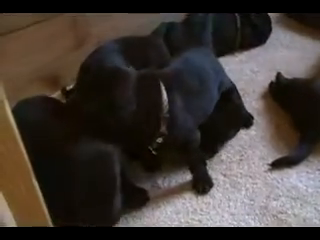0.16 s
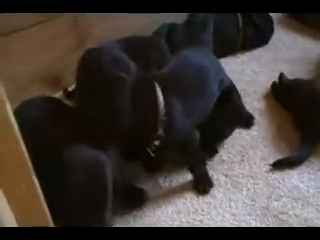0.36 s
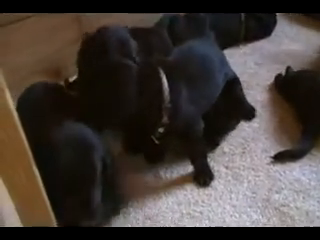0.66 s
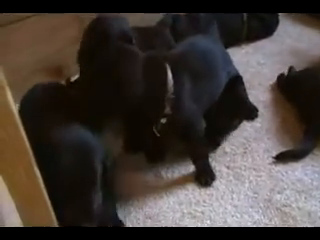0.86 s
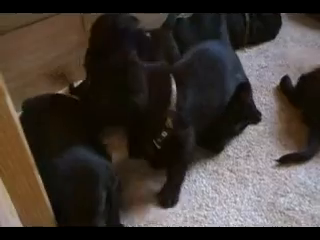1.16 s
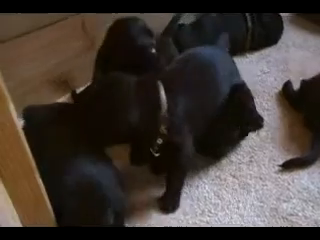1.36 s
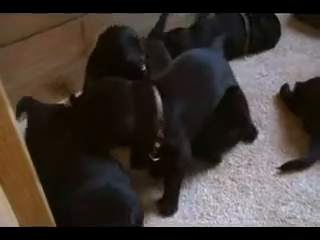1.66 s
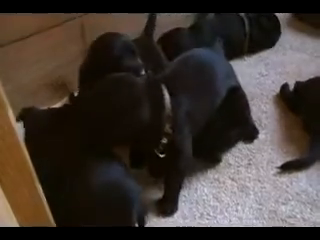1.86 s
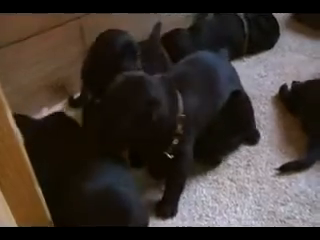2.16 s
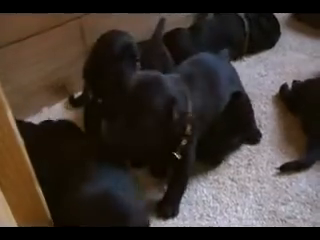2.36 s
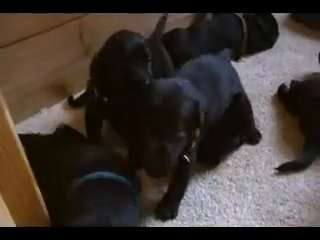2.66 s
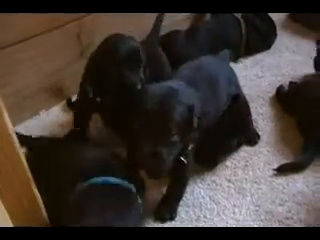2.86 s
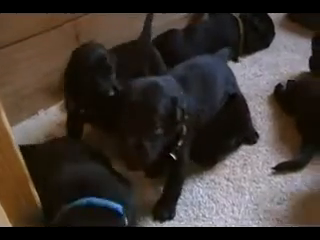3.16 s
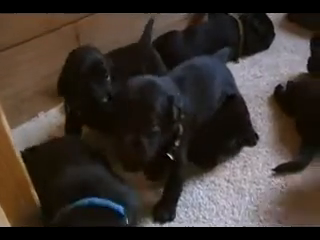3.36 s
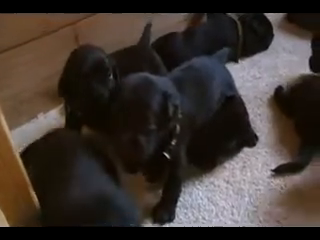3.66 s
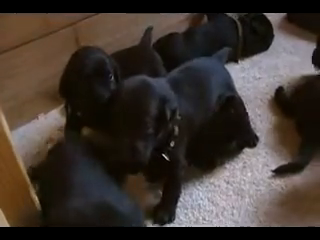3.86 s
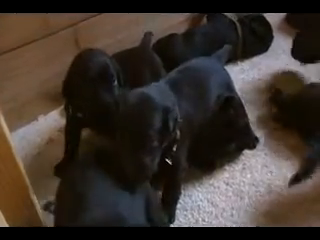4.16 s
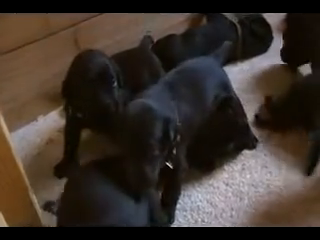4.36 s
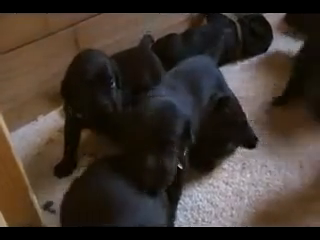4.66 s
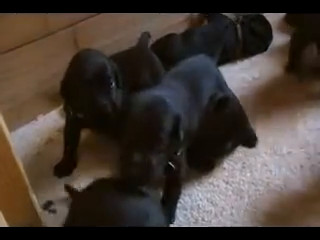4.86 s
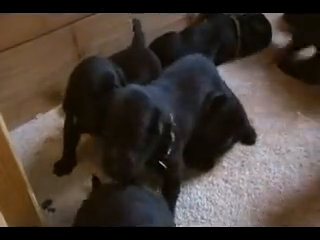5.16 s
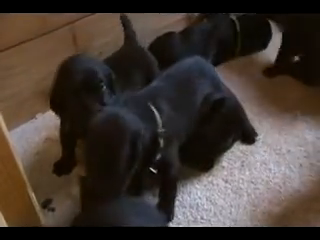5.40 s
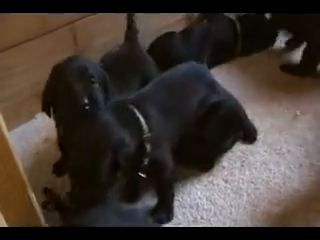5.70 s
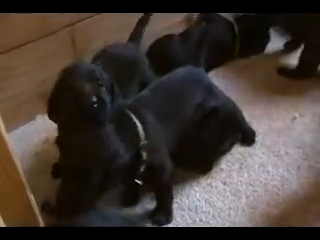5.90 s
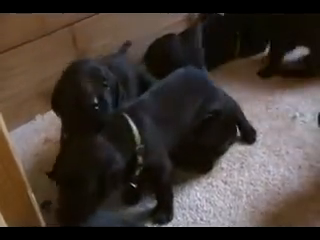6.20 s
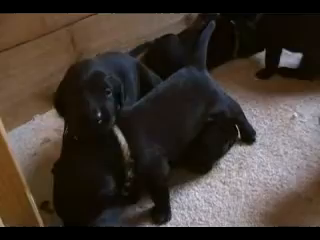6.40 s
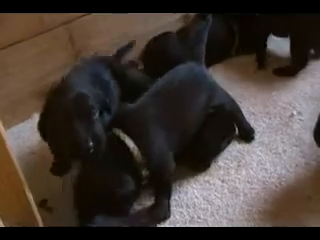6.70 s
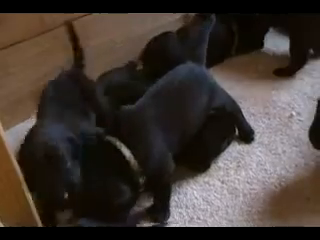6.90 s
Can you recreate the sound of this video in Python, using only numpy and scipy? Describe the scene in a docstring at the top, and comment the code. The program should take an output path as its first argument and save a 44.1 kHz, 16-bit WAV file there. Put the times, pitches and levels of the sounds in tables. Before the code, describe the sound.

Young puppies yelp, give two piercing screams, then whimper in quick whistles, yelps, hoots and tired groans, with paws bumping in a small carpeted box.

```python
"""Puppies whimpering in a box

A litter in a carpeted wooden box, close to two microphones in a small room: a yelp, two screams, then
whistles, yelps, hoots, moans and groans. Each voice is a pulse train ringing a throat filter, plus air noise.
Paws are decaying sines, claws and scuffs short noise bands; rumble, hiss and rustle are shaped stereo noise."""
import sys
import numpy as np
from scipy import signal
from scipy.fft import rfft, irfft
from scipy.io import wavfile
from scipy.ndimage import map_coordinates

SR = 44100
rng = np.random.default_rng(int(sys.argv[2]) if len(sys.argv) > 2 else 0)


def waveform_to_disk(signal):
    """Save audio, clipped to [-1, 1], as 16-bit WAV at the path in sys.argv[1]."""
    frames = np.transpose(np.atleast_2d(signal))
    scaled = np.clip(frames, -1, 1) * 32767
    samples = np.round(scaled).astype(np.int16)
    wavfile.write(sys.argv[1], SR, samples)


N = 310464

# Room rumble: (time [s], level [dB])
RUMBLE_LEVEL = [(3.6, -40), (6.5, -47)]
# Room hiss spectrum, used above 40 Hz: (frequency [Hz], relative density [dB])
HISS_SPECTRUM = [(12, -29), (20, 1), (46, -3), (352, -15.5), (505, -19.5), (725, -18), (1070, -25.5),
                 (1450, -23), (3000, -29.5), (9130, -31.5), (13900, -45.5), (15500, -67)]
HISS_DB = -46
# Rustle of bodies, before rustle_db and flicker: (time [s], level [dB])
RUSTLE_LEVEL = [(0, -57), (.6, -50.5), (3, -50.5), (7.04, -50)]
# Rustle spectrum: (frequency [Hz], relative level [dB])
RUSTLE_SPECTRUM = [(150, 13.5), (400, -17), (3000, -0.5), (8000, -9), (14000, -15.5)]
# Left-right likeness of the noise: (frequency [Hz], shared power [0-1])
STEREO_LIKENESS = [(200, 0.67), (4000, 0.25), (12000, 0.8)]

# Paws on the box floor: (time [s], level before the rise [dB], ring [Hz], t60 [s])
PAW_BUMPS = [(0.021, -21.5, 96.4, 0.16), (1.463, -29, 102.5, 0.2), (2.189, -25, 102.6, 0.22),
             (3.381, -29.5, 145, 0.17), (3.453, -9.5, 140, 0.021), (4.363, -11, 102.5, 0.063),
             (4.527, -28.5, 101, 0.12), (5.197, -22.5, 141, 0.071), (5.453, -21, 102.5, 0.19),
             (6.401, -29.5, 103, 0.16), (6.988, -4, 112, 0.012)]
# Claws and collars: (time [s], level before tick_db [dB], ring [Hz])
CLAW_TICKS = [(0.324, -31.5, 9800), (0.7291, -27, 1915), (2.824, -35, 9850), (3.336, -24, 1900),
              (4.438, -35, 3450), (5.1557, -26, 7400), (6.1846, -31, 1760), (6.4445, -28, 6000),
              (6.561, -32.5, 2400), (6.765, -27, 7560), (6.8536, -30, 1940)]
# Paws and fur on carpet: (time [s], length [s], level before the stroke envelope [dB], centre [Hz])
CARPET_SCUFFS = [(0.181, 0.055, -39.5, 600), (1.199, 0.036, -42, 515), (2.386, 0.1, -44.5, 477),
                 (3.578, 0.017, -39.5, 630), (5.139, 0.048, -38.5, 454), (5.15, 0.17, -53, 7250),
                 (5.416, 0.036, -48, 2330)]

# Throat, mouth nearly shut: (frequency [Hz], relative gain [dB])
SHUT_THROAT = [(40, -15.5), (250, 0.5), (500, 1), (740, 8), (1050, -14), (1350, -9.5), (1750, -13.5),
               (2020, -23.5), (3000, -43.5), (4000, -47), (5100, -32), (6400, -49.5), (8500, -41.5),
               (12000, -80)]
# Throat, mouth wide open: (frequency [Hz], relative gain [dB])
OPEN_THROAT = [(60, -8), (300, 0.5), (450, -11), (650, -0.5), (950, 5.5), (1500, 7), (1950, 8), (2400, 3),
               (3050, -22.5), (3750, -2.5), (4600, 1), (5400, -1.5), (6100, -10), (6900, -18), (12000, -51)]
# Throat tightened for the breaking scream: (frequency [Hz], gain added to the open throat [dB])
TIGHT_THROAT = [(300, 4), (600, 2.5), (1500, 3), (2400, -1.5), (3750, 7), (4600, 8.5), (5400, -8.5),
                (6100, -4.5), (9000, 5)]
# Mouth opened a little for a yelp: (frequency [Hz], gain added to the shut throat [dB])
AJAR_MOUTH = [(400, 0), (720, -1), (1050, 3.5), (1700, 0), (2200, -3.5), (3000, 0), (5200, 3), (8000, 1)]
# Nose passage of the grunts: (frequency [Hz], relative gain [dB])
NOSE_PASSAGE = [(80, -39), (270, 7.5), (450, -7), (700, 5.5), (1150, -12), (2100, -10), (3300, -46),
                (9000, -46)]
# Breath spectrum: (frequency [Hz], relative level [dB])
BREATH_SPECTRUM = [(300, -14), (1500, -6), (3000, -8), (5200, -9), (6500, -24), (8800, 1.5), (14000, -30)]
# Lip opening of the muffled voice: (time [s], gain above 3.5 kHz [dB])
LIP_OPENING = [(1.3, -1), (2.5, 5), (4.6, 2), (6, 6)]
# Nasal resonance as the voice tires: (time [s], gain at NASAL_HZ [dB])
NASAL_GAIN = [(4, -15), (4.6, 2.5), (6.3, 11)]
NASAL_HZ, NASAL_WIDTH_HZ = 1328, 71

# In the cry tables, split is the weakening of every other pulse.
# Yelps: (start [s], length [s], rasp level [dB], clear end level [dB], first pitch [Hz], lowest pitch [Hz],
# last pitch [Hz], added roughness of the rasp [0-1], brightness before the final dulling [dB])
YELP_EVENTS = [(0.249, 0.036, -24.5, -19, 940, 597, 718, 0.65, 6),
               (1.296, .055, -22.5, -16, 838, 682, 792, 0.82, 18),
               (1.572, 0.14, -21.5, -17.5, 798.8, 587, 810, 1, 18),
               (1.938, 0.093, -21, -20, 830, 546, 710, 0.84, 17),
               (2.225, .081, -20, -12.5, 759, 656, 812, 0.77, 16.5),
               (2.575, .057, -23, -18, 780, 576, 773, 0.85, 11),
               (2.896, 0.021, -20, -20, 710, 686, 884, 0.65, 6.5),
               (4.04, .077, -20, -18.5, 734, 579, 750, 0.28, 13.5),
               (5.276, .051, -17.5, -21, 846, 453.4, 718, 0.65, 5.5)]
RECOVER_S, CLEAR_S = .031, 0.015  # pitch minimum before the end; time for the rasp to clear
RASP_SPLIT, CLEAR_ROUGH, CLEAR_DULL_DB = 0.39, 0.04, -11
THROB_DB, THROB_HZ = 4, 55.7  # depth at full roughness; beating rate
PUFF_DB, PUFF_S, PUFF_HZ, PUFF_SHARPNESS = -51, 0.039, 3500, 1.8
# Clear scream: (time [s], pitch [Hz], fundamental level [dB], overtones over it [dB])
SCREAM_CURVE = [(0.505, 970, -22, -6), (0.513, 1030, -20.5, -19), (0.525, 1130, -23, -12),
                (0.535, 1188, -27, 16), (0.559, 1223, -23, 12.5), (0.573, 1306, -17.5, 2.5),
                (0.593, 1213, -20.5, 3.5), (0.617, 1235, -21.5, -7.5), (0.641, 1094, -27.5, 10.5),
                (0.663, 1123, -27, 8), (0.676, 1081, -37, 4)]
CATCH_S, GASP_S, GASP_DB = 0.0039, .026, -37  # rough catch, closing gasp
# Breaking scream, before beating: (time [s], level [dB], pitch [Hz], split [0-1], roughness [0-1], brightness [dB])
SHRIEK_CURVE = [(0.86, -15.5, 1115, 0.62, 0.55, -11), (.868, -32, 1198, 0.2, 0.05, -12),
                (.894, -17, 1323, 0, 0.08, -9), (.91, -12.5, 1442, 0, 0.07, -7),
                (.915, -47, 1467, 0.2, 0.43, -22), (0.92, -16, 572, 0.06, 0.98, 2),
                (0.962, -18, 618, 1, 0.33, 2), (1.018, -21, 638, 0.84, 0.29, -9.5),
                (1.044, -39, 775, .4, 0.2, -17)]
SHRIEK_THROB_DB, SHRIEK_SWAY = 2.5, 0.0406  # level and fractional pitch beating at full roughness
# Thin whistles, mostly leading into a yelp: (start [s], length [s], level after the swell [dB],
# first pitch [Hz], top pitch [Hz], roughness [0-1], brightness [dB])
WHISTLE_EVENTS = [(1.269, 0.0324, -25.5, 1200, 1283, 0.03, 10), (1.539, 0.034, -28.5, 870, 1140, 0, -6),
                  (1.893, 0.049, -28, 932, 1244, 0, -11), (2.211, 0.019, -30.5, 1070, 1190, 0.06, 0),
                  (2.532, 0.038, -30, 850, 1140, 0.02, -10), (2.84, 0.05, -36.5, 860, 1147, 0, -15),
                  (3.984, 0.058, -23.5, 731, 1136, 0.18, 9), (4.297, 0.062, -46, 990, 1160, 0, -13)]
SWELL_DB, SWELL_S = -7, 0.007  # initial offset and time constant, whistles and hoots
# Grunts through the nose: (start [s], length [s], first level [dB], pitch [Hz], split [0-1],
# roughness [0-1], first brightness [dB])
GRUNT_EVENTS = [(3.006, 0.012, -20, 667, 0.05, 0.37, 13.5), (3.285, 0.023, -22, 687, 1, 0.34, 10.5),
                (6.376, 0.0166, -25.5, 532, 1, 0.28, 0.5), (6.65, 0.038, -26.5, 486.5, 0.98, 0.34, 3)]
GRUNT_FADE_DB, GRUNT_DULL_DB = -21, -11
# Soft hoots: (start [s], length [s], level before swell and ring [dB], first, middle, last pitch [Hz],
# split [0-1], roughness [0-1], brightness [dB])
HOOT_EVENTS = [(3.206, .017, -13, 787, 735, 793, 0.21, 0.36, 11),
               (3.432, 0.009, -19, 875, 840, 790, .03, 0.37, -8),
               (3.459, 0.037, -15.5, 913, 819, 672, .07, 0.59, 5),
               (3.705, .058, -15.5, 722, 881, 653, 0.014, 0.044, -3.5),
               (4.372, 0.014, -13, 770, 701, 700, .08, 0.49, 7),
               (5.24, .039, -15, 720, 890, 900, 0.15, 0.23, -2),
               (5.542, 0.022, -15, 714, 763, 820, 0.25, 0.24, -4),
               (5.57, 0.0095, -14, 826, 827, 866, 0.48, 0.3, -4),
               (5.588, 0.018, -14, 898, 737, 574, 0.11, 0.074, -1.5)]
HOOT_RING = 0.72  # share of the throat resonance followed by the level
# Two drawn-out moans, one curve each: (time [s], level [dB], pitch [Hz], split [0-1], roughness [0-1],
# brightness [dB])
MOAN_CURVES = [
    [(4.592, -22, 687, 0, 0.2, 1), (4.601, -18.5, 825, 0.44, 0.5, 9.5),
     (4.62, -15.5, 808, 0.63, 0.11, -1.5), (4.649, -15, 865, 0.74, 0.04, 0.5),
     (4.664, -20, 918, 1, 0.13, 30), (4.718, -19, 857, 0.93, 0, 0.5), (4.735, -32, 930, 1, 0.1, -7)],
    [(4.949, -13.5, 854, 0.16, 0.65, -2), (4.965, -17.5, 698, 1, 0.28, 3.5),
     (4.997, -16, 812, 0.78, 0.3, 3), (5.022, -25.5, 1282, 1, .24, -6)],
]
# Tired groans: (start [s], time to the drop [s], length [s], level at the drop [dB], upper pitch [Hz],
# lower pitch [Hz], brightness [dB])
GROAN_EVENTS = [(5.784, .043, 0.059, -16.5, 708.5, 515, -2), (6.06, 0.0154, 0.042, -20.5, 640, 483, -3.5),
                (6.299, 0.018, 0.064, -20, 677, 518.3, -3.5), (6.576, .019, 0.0478, -24.5, 599, 458, -3.5),
                (6.872, 0.0021, 0.032, -21, 506, 499, -2)]
GROAN_SWELL_DB, GROAN_FADE_DB, DROP_S = -7.5, -8.5, 0.0016

# Reverberation: (frequency [Hz], t60 [s], relative level [dB])
ROOM_DECAY = [(150, 0.18, -4), (724, 0.16, -4), (1540, 0.12, -2.5), (2500, 0.17, -5.5), (8000, 0.12, 3.5)]
# Channel balance: (frequency [Hz], left minus right [dB])
CHANNEL_BALANCE = [(100, 1.1), (500, -0.3), (1200, 0.2), (2400, 2.5), (4800, -3), (8000, 0)]
EDGE_HZ = 15400


def amp(db):
    """Decibels to gain."""
    return 10 ** (np.asarray(db) / 20)


def unit(x):
    """Scales to rms 1."""
    return x / np.sqrt(np.mean(x ** 2) + 1e-20)


def read(points, hz):
    """Reads a table on a log-frequency axis."""
    f, value = np.transpose(points)
    return np.interp(np.log(hz + 1), np.log(f + 1), value)


def add(mix, s, sound):
    """Lays a sound into the mix at a time."""
    part = mix[max(round(s * SR), 0):][:len(sound)]
    part += sound[:len(part)]


def colour(x, points, size=2048):
    """Minimum-phase filter with the given spectrum: it rings after each pulse, never before."""
    log_gain = np.log(amp(read(points, abs(np.fft.fftfreq(size, 1 / SR)))))
    taps = np.fft.ifft(np.exp(np.conj(signal.hilbert(log_gain)))).real
    return signal.fftconvolve(x, taps[:size // 2])[:len(x)]


def band_noise(size, hz, sharpness):
    """Noise in one resonance, rms 1."""
    f = np.fft.rfftfreq(size, 1 / SR) + 1
    resonance = 1 + 1j * sharpness * (f / hz - hz / f)
    return unit(irfft(rfft(rng.standard_normal(size)) / resonance, size))


def wide_noise(points):
    """Two partly alike channels of noise with the given spectrum, rms 1."""
    hz = np.fft.rfftfreq(N, 1 / SR)
    common, *apart = rfft(rng.standard_normal((3, N)))
    same = np.clip(read(STEREO_LIKENESS, hz), 0, 1)
    stereo = np.sqrt(same) * common + np.sqrt(1 - same) * np.array(apart)
    return unit(irfft(stereo * amp(read(points, hz)), N))


def background(rumble_hz=31, rustle_db=-5, flicker_db=2):
    """Room rumble and hiss, and the uneven rustle of bodies shifting against each other."""
    t = np.arange(N) / SR
    rumble = wide_noise([(rumble_hz / 2, -18), (rumble_hz, 0), (rumble_hz * 2, -36), (rumble_hz * 10, -90)])
    hiss = wide_noise([(30, -31)] + [(max(hz, 70), db) for hz, db in HISS_SPECTRUM if hz > 40])
    stir_db = np.interp(t, *np.transpose(RUSTLE_LEVEL)) + flicker_db * band_noise(N, 19.0, 1.0)
    rustle = amp(stir_db + rustle_db) * wide_noise(RUSTLE_SPECTRUM)
    rumble_db = np.interp(t, *np.transpose(RUMBLE_LEVEL))
    return amp(rumble_db) * rumble + amp(HISS_DB) * hiss + rustle


def paws(rise_s=0.002, scuff_sharpness=4.7, tick_sharpness=4.3, tick_db=-7, tick_t60_s=0.022):
    """Soft bumps ring the floor of the box, claws tick, pads drag on the carpet."""
    out, t = np.zeros(N), np.arange(SR // 3) / SR
    for s, db, hz, t60_s in PAW_BUMPS:
        decay = amp(db - 60 * t / t60_s)
        add(out, s, decay * (1 - np.exp(-t / rise_s)) * np.sin(2 * np.pi * hz * t))
    for s, db, hz in CLAW_TICKS:
        decay = amp(db + tick_db - 60 * t / tick_t60_s)
        add(out, s, decay * band_noise(len(t), hz, tick_sharpness))
    for s, length_s, db, hz in CARPET_SCUFFS:
        stroke = np.sqrt(np.hanning(int(length_s * SR)))
        add(out, s, amp(db) * stroke * band_noise(len(stroke), hz, scuff_sharpness))
    return out


def folds(hz, split, rough, turbulence, jitter=0.12, shimmer=0.7, waver=.002, lurch=0.0835,
          puff_s=0.00055, size=8):
    """One pulse a cycle; weak alternate pulses add the octave below, uneven ones make the voice harsh."""
    n, rough = np.arange(len(hz)), np.clip(rough, 0, 1)
    wobble = (waver + lurch * rough) * band_noise(len(hz), 57.2, 0.95)  # a strained voice lurches
    turns = np.cumsum(hz * (1 + wobble)) / SR
    at = np.interp(np.arange(.5, turns[-1]), turns, n)
    late, strong = rng.standard_normal((len(at), 2)).T
    hz, split, uneven = (np.interp(at, n, c) for c in (hz, np.clip(split, 0, 1), rough))
    at = at + jitter * uneven * late * SR / hz
    alternate = 1 - split * (np.arange(len(at)) % 2)
    height = alternate * np.exp(shimmer * uneven * strong) / np.sqrt(hz)
    # windowed sinc: pulses fall between samples
    near = at.astype(int)[:, None] + np.arange(-size, size + 1)
    offset = near - at[:, None]
    shapes = height[:, None] * np.sinc(offset) * np.sinc(offset / size)
    pulses = np.bincount(np.clip(near, 0, n[-1]).ravel(), shapes.ravel(), len(n))
    # each rough pulse lets out a short puff of turbulent air
    keep = np.exp(-2 / (puff_s * SR))
    puffs = np.sqrt(signal.lfilter([1 - keep], [1, -keep], pulses ** 2)) * rng.standard_normal(len(n))
    return turbulence * rough * puffs - pulses


def spread(x, path_s, back=.55):
    """All-pass: quick echoes between the box walls lengthen each pulse without colouring it."""
    loop = np.r_[1, np.zeros(round(path_s * SR)), -np.clip(back, 0, .8)]
    return signal.lfilter(loop[::-1], loop, x)


def cry(rows, throat, turbulence, upper_hz, air_db, air_growth, lead_s=.004, size=400):
    """Pulses ring the throat; brightness lifts the partials above upper_hz; air hisses through the mouth."""
    s, *columns = np.transpose(rows)
    s = np.sort(s)
    t = np.arange(s[0] - lead_s, s[-1] + lead_s, 1 / SR)
    level_db, hz, split, rough, bright_db = (np.interp(t, s, c) for c in columns)
    voice = colour(folds(hz, split, rough, turbulence), throat)
    voice = spread(spread(voice, .00052), .00083)
    voice = signal.sosfilt(signal.butter(2, 130, "highpass", fs=SR, output="sos"), voice)
    lower = signal.sosfiltfilt(signal.butter(N=4, Wn=upper_hz, fs=SR, output="sos"), voice)
    voice = lower + amp(bright_db) * (voice - lower)
    # level out, so that loudness follows the effort alone
    window = np.hanning(size) / np.hanning(size).sum()
    voice = voice / np.sqrt(abs(signal.fftconvolve(voice ** 2, window, "same")) + 1e-12)
    # air_db holds at a voice level of -13 dB
    air = unit(colour(rng.standard_normal(len(t)), BREATH_SPECTRUM)) * amp(air_db + air_growth * (level_db + 13))
    # each cry fades in and out over twice lead_s
    edges = np.clip(np.minimum(t - t[0], t[-1] - t) / (2 * lead_s), 0, 1) ** 2
    return t[0], (voice * amp(level_db) + air) * edges


def controls(*curves):
    """Rows of (time [s], level [dB], pitch [Hz], split, roughness, brightness [dB]) for one cry."""
    return np.column_stack(np.broadcast_arrays(*curves))


def muzzle(s, extra=((1, 0), (2, 0)), count=160):
    """The nearly shut throat at a given time, with any extra shaping: (frequency [Hz], gain [dB])."""
    hz = np.geomspace(40, 12000, count)
    lips_db, nasal_db = (np.interp(s, *np.transpose(curve)) for curve in (LIP_OPENING, NASAL_GAIN))
    nasal = nasal_db * np.exp(-((hz - NASAL_HZ) / NASAL_WIDTH_HZ) ** 2)
    gain_db = read(SHUT_THROAT, hz) + read(extra, hz) + nasal + lips_db * (hz > 3500)
    return np.column_stack([hz, gain_db])


def throb(t, count=64):
    """Smooth random beating of a rasping voice, from two random points per cycle of THROB_HZ."""
    return map_coordinates(rng.standard_normal(count), [2 * THROB_HZ * t], mode="wrap")


def yelp(start, length, rasp_db, clear_db, first_hz, low_hz, last_hz, rough, bright_db, dip_db=-2):
    """The voice breaks into a throbbing rasp and sinks, then clears and swoops to its last pitch."""
    t = np.arange(0, length, 1 / SR)
    turn = max(length - RECOVER_S, length / 4)
    sink = np.minimum(t / turn, 1)
    rise = np.sin(np.pi / 2 * np.maximum(t - turn, 0) / (length - turn)) ** 2
    rasp = np.clip((turn - t) / CLEAR_S + .5, 0, 1)
    hz = first_hz + (low_hz - first_hz) * sink + (last_hz - low_hz) * rise
    throbbing_db = rasp_db + THROB_DB * rough * throb(t)
    db = rasp * throbbing_db + (1 - rasp) * (clear_db + dip_db * (1 - rise))
    return controls(start + t, db, hz, RASP_SPLIT * rasp, CLEAR_ROUGH + rough * rasp,
                    bright_db + CLEAR_DULL_DB * rise)


def puff():
    """Band noise: a short, soft hiss through the nostrils after a yelp or moan."""
    window = np.hanning(int(PUFF_S * SR))
    return amp(PUFF_DB) * window * band_noise(len(window), PUFF_HZ, PUFF_SHARPNESS)


def scream(steady_rough=0.0051, fray_rough=0.045, split=0.012):
    """A clear, high voice: it catches at the start, frays as it tires and ends in a gasp."""
    s, hz, low_db, over_db = np.transpose(SCREAM_CURVE)
    t = np.arange(s[0], s[-1] + GASP_S, 1 / SR)
    gasp = np.clip((t - s[-1]) / CATCH_S, 0, 1)
    # fundamental and overtones add in power
    loud_db = np.interp(t, s, low_db + 10 * np.log10(1 + amp(over_db) ** 2))
    fray = fray_rough * ((t - s[0]) / (s[-1] - s[0])) ** 4
    catch = np.exp(-((t - s[0]) / CATCH_S) ** 2)
    rough = steady_rough + fray + catch + gasp
    db = loud_db + gasp * (GASP_DB - loud_db)
    return controls(t, db, np.interp(t, s, hz), split, rough, np.interp(t, s, over_db))


def shriek():
    """The broken scream beats in level and pitch, the more the rougher it is."""
    s, *columns = np.transpose(SHRIEK_CURVE)
    t = np.arange(s[0], s[-1], 1 / SR)
    db, hz, split, rough, bright_db = (np.interp(t, s, c) for c in columns)
    beat = rough * throb(t - t[0])
    return controls(t, db + SHRIEK_THROB_DB * beat, hz * (1 + SHRIEK_SWAY * beat), split, rough, bright_db)


def swell_db(t):
    """Soft start of a clean tone."""
    return SWELL_DB * np.exp(-t / SWELL_S)


def whistle(start, length, db, first_hz, top_hz, rough, bright_db):
    """A clean tone climbs and levels off."""
    t = np.arange(0, length, 1 / SR)
    hz = first_hz + (top_hz - first_hz) * np.sin(np.pi / 2 * t / length)
    return controls(start + t, db + swell_db(t), hz, 0, rough, bright_db)


def grunt(start, length, db, hz, split, rough, bright_db):
    """Holds one pitch while it fades and dulls."""
    u = np.linspace(0, 1, int(length * SR))
    return controls(start + u * length, db + GRUNT_FADE_DB * u ** 2, hz, split, rough,
                    bright_db + GRUNT_DULL_DB * u ** 2)


def hoot(start, length, db, first_hz, middle_hz, last_hz, split, rough, bright_db):
    """The pitch draws a parabola; the level follows the throat's resonance at that pitch."""
    u = np.linspace(0, 1, int(length * SR))
    hz = np.polyval(np.polyfit([0, .5, 1], [first_hz, middle_hz, last_hz], 2), u)
    ring_db = read(SHUT_THROAT, hz)
    level_db = db + swell_db(u * length) + HOOT_RING * (ring_db - ring_db.max())
    return controls(start + u * length, level_db, hz, split, rough, bright_db)


def groan(start, drop_at, length, db, upper_hz, lower_hz, bright_db):
    """Swells, falls into a lower, doubled register and fades."""
    t = np.arange(0, length, 1 / SR)
    dropped = np.clip((t - drop_at) / DROP_S + .5, 0, 1)
    hz = np.interp(dropped, [0, 1], [upper_hz, lower_hz])
    split = np.interp(dropped, [0, 1], [0.37, 0.81])
    rough = np.interp(dropped, [0, 1], [0.4, 0.42])
    level_db = db + np.interp(t, [0, drop_at, length], [GROAN_SWELL_DB, 0, GROAN_FADE_DB])
    return controls(start + t, level_db, hz, split, rough, bright_db)


def whimpers():
    """Muffled whistles, yelps, hoots, moans and groans, with a few grunts through the nose."""
    out, yelps = np.zeros(N), [yelp(*row) for row in YELP_EVENTS]
    for rows in yelps:
        throat = muzzle(rows[0][0], AJAR_MOUTH)
        add(out, *cry(rows, throat, turbulence=0.37, upper_hz=935, air_db=-47, air_growth=0.69))
    for rows in [whistle(*row) for row in WHISTLE_EVENTS] + [hoot(*row) for row in HOOT_EVENTS]:
        add(out, *cry(rows, muzzle(rows[0][0]), turbulence=0.13, upper_hz=920, air_db=-47, air_growth=1.0))
    for rows in MOAN_CURVES + [groan(*row) for row in GROAN_EVENTS]:
        add(out, *cry(rows, muzzle(rows[0][0]), turbulence=0.23, upper_hz=926, air_db=-45, air_growth=0.79))
    for row in GRUNT_EVENTS:
        add(out, *cry(grunt(*row), NOSE_PASSAGE, turbulence=0.4, upper_hz=1150, air_db=-43, air_growth=.28))
    for rows in yelps + MOAN_CURVES:
        add(out, rows[-1][0], puff())
    return out


def screams():
    """Two open-mouthed cries: one stays clear, the next breaks."""
    out = np.zeros(N)
    tight = [(hz, db + read(TIGHT_THROAT, hz)) for hz, db in OPEN_THROAT]
    add(out, *cry(scream(), OPEN_THROAT, turbulence=1.0, upper_hz=1750, air_db=-45, air_growth=.6))
    add(out, *cry(shriek(), tight, turbulence=0.99, upper_hz=1940, air_db=-53, air_growth=0.35))
    return out


def room(x, wet_db, gap_s, apart):
    """Sparse wall reflections, each band dying at its own speed."""
    size = SR // 2
    common, *sides = rng.choice([-1., 1.], (3, size)) * (rng.random((3, size)) < 3000 / SR)
    taps = (common + apart * np.array(sides)) * (np.arange(size) > gap_s * SR)
    hz, t, z = signal.stft(taps, SR, nperseg=256)
    t60_s, db = (read([(row[0], row[k]) for row in ROOM_DECAY], hz)[:, None] for k in (1, 2))
    z = z * amp(db - 60 * t / t60_s)
    tail = signal.istft(z, SR, nperseg=256)[1]
    return amp(wet_db) * signal.fftconvolve(x[None], tail / np.linalg.norm(tail[0]), axes=1)[:, :N]


def scene():
    """Puppies and paws in the room, over its background."""
    near = screams() + whimpers() + paws()
    return near + room(near, wet_db=-4.0, gap_s=0.00622, apart=0.69) + background()


def record(dry, wide_hz=7500, wide_db=5):
    """Two close microphones that grow unlike in the treble, then the band limit."""
    hz = np.fft.rfftfreq(N, 1 / SR)
    lean_db, z = read(CHANNEL_BALANCE, hz), rfft(dry)
    middle = z.mean(0)
    side = (z - middle) * amp(wide_db / (1 + (wide_hz / (hz + 1)) ** 4))
    heard = irfft((middle + side) * amp([lean_db / 2, -lean_db / 2]), N)
    low_pass = signal.firwin(401, EDGE_HZ, window=("kaiser", 9), fs=SR)
    return signal.oaconvolve(heard, low_pass[None], "same")


dry = scene()
out = record(dry)
waveform_to_disk(out)
```